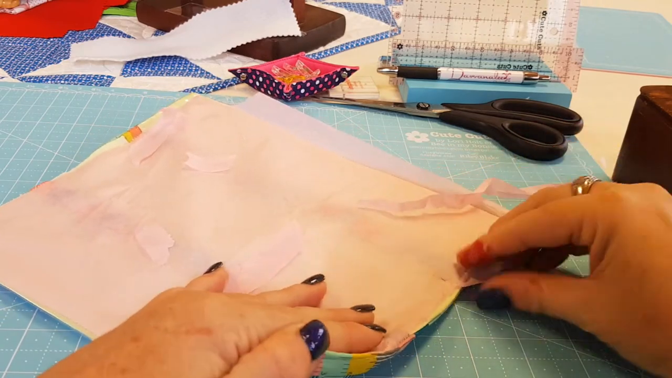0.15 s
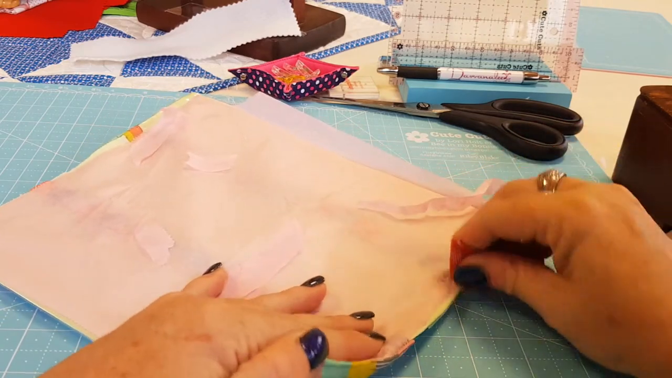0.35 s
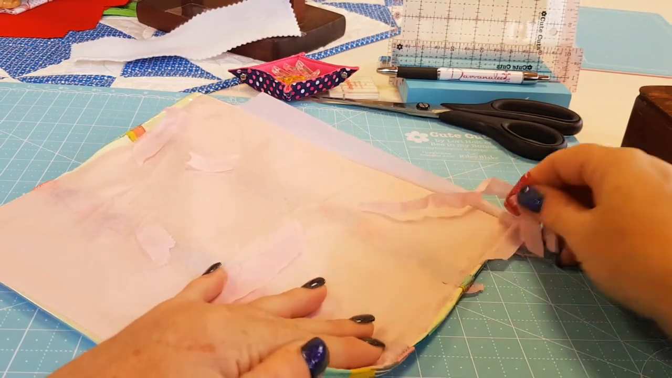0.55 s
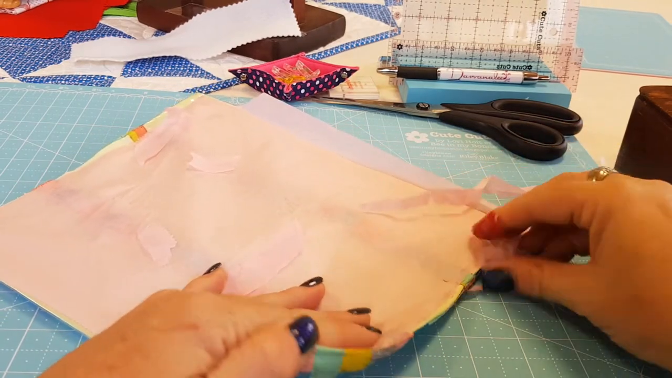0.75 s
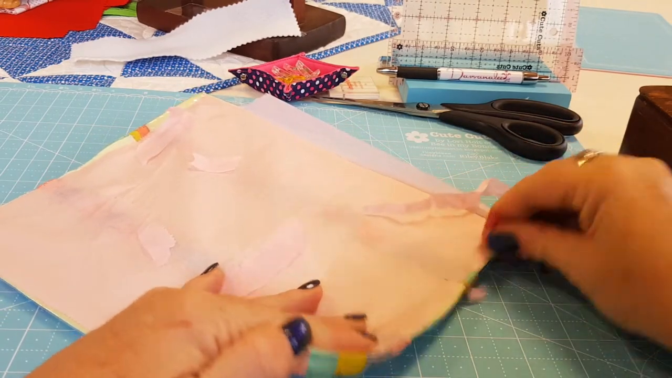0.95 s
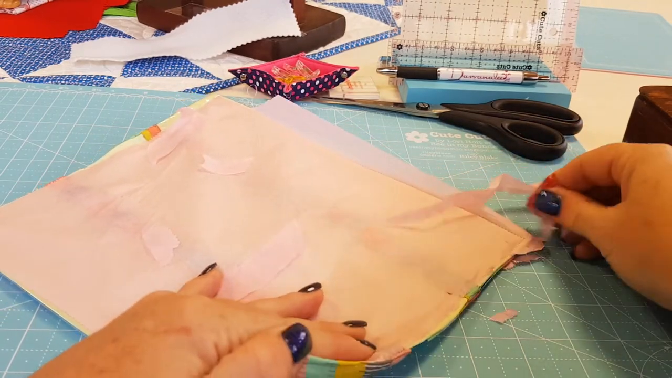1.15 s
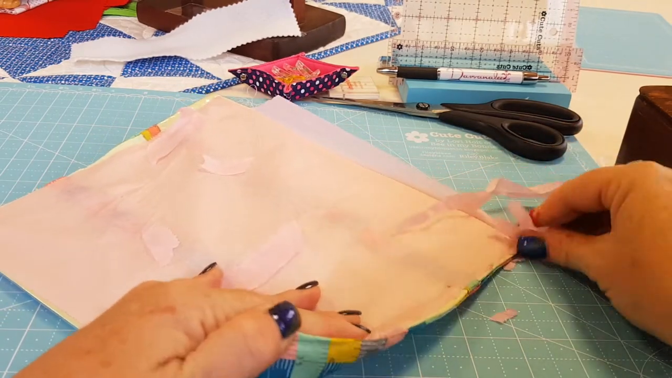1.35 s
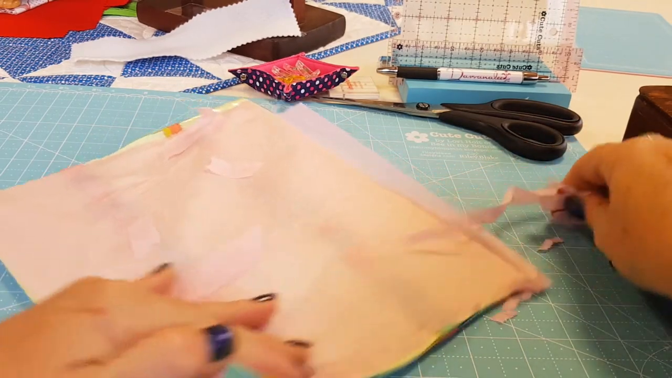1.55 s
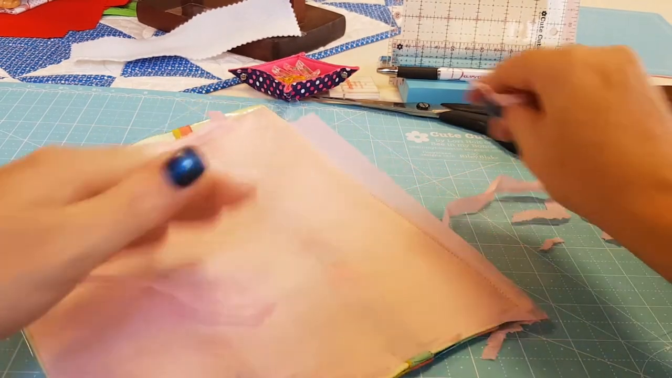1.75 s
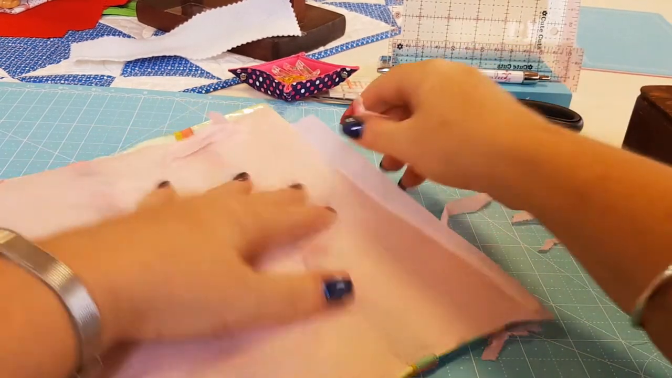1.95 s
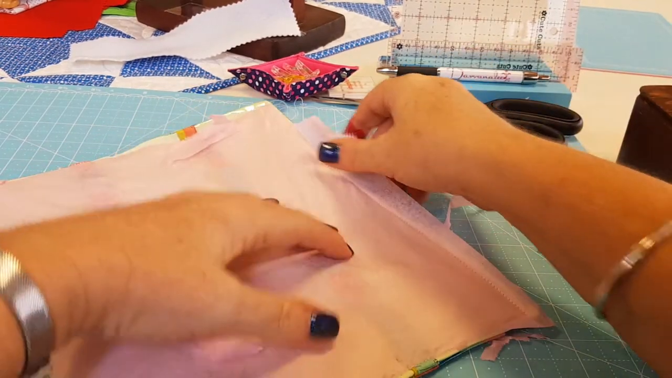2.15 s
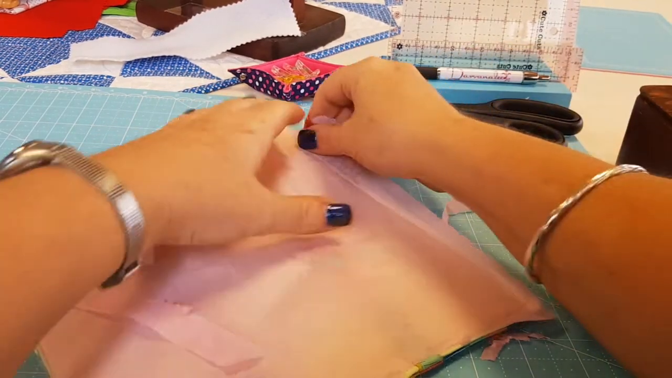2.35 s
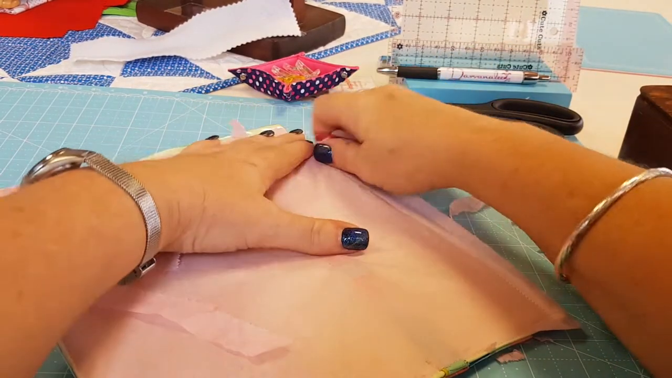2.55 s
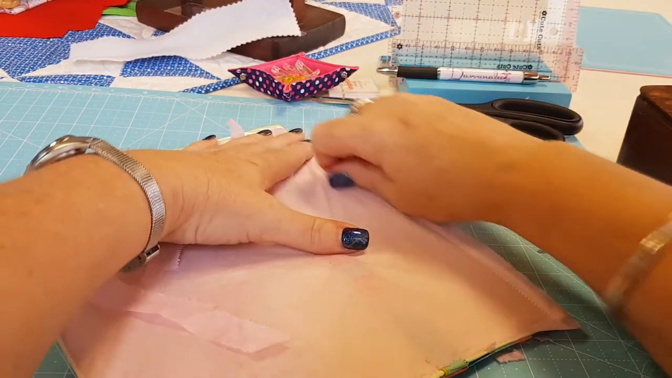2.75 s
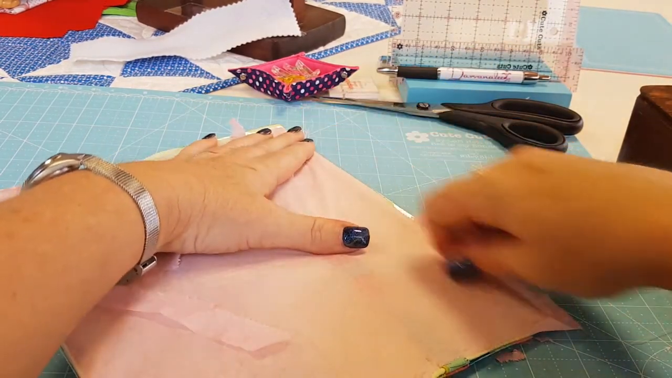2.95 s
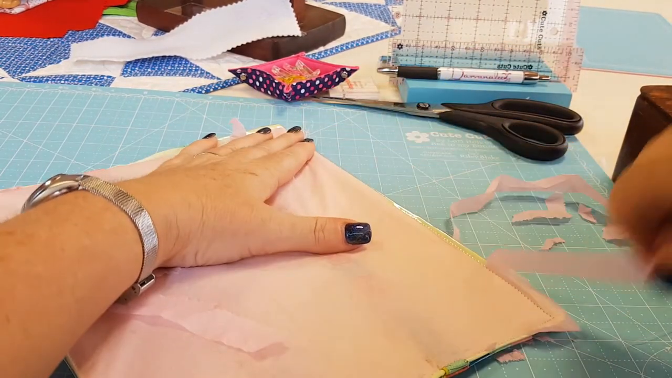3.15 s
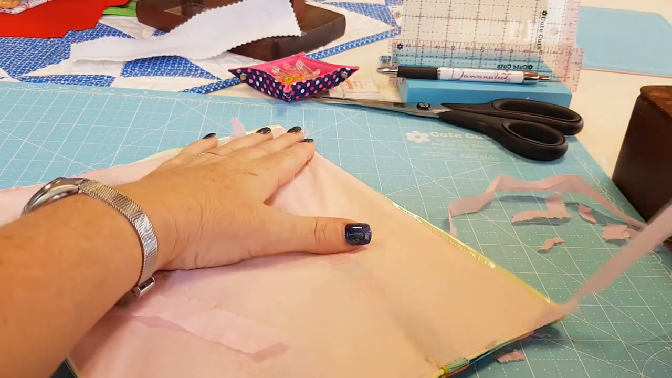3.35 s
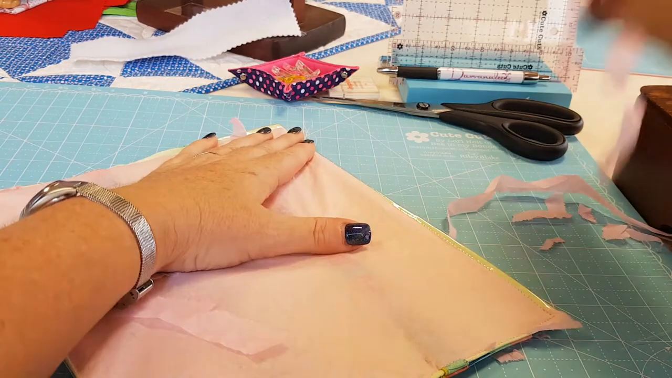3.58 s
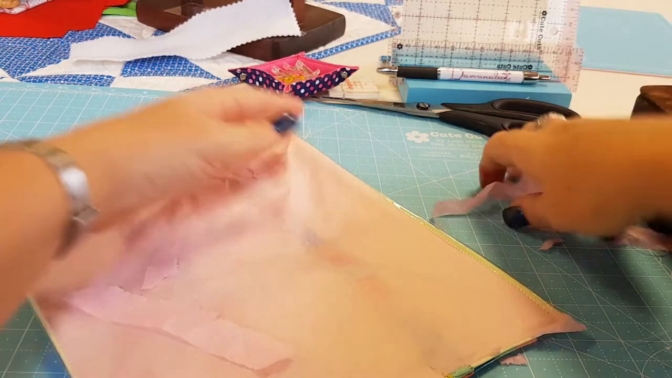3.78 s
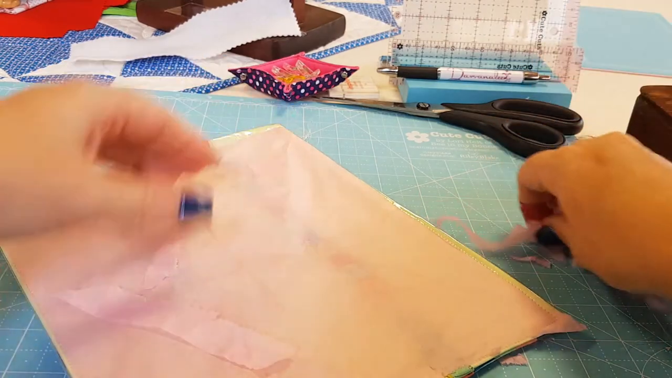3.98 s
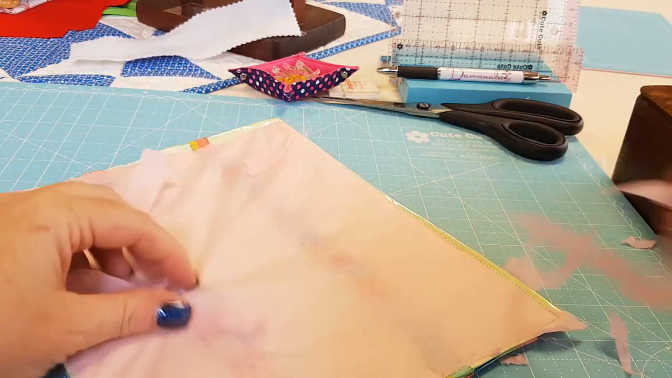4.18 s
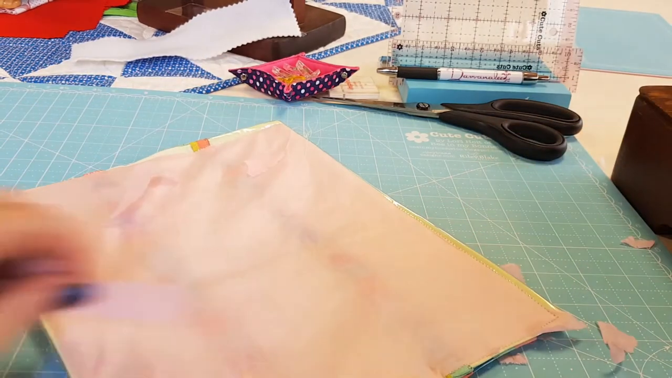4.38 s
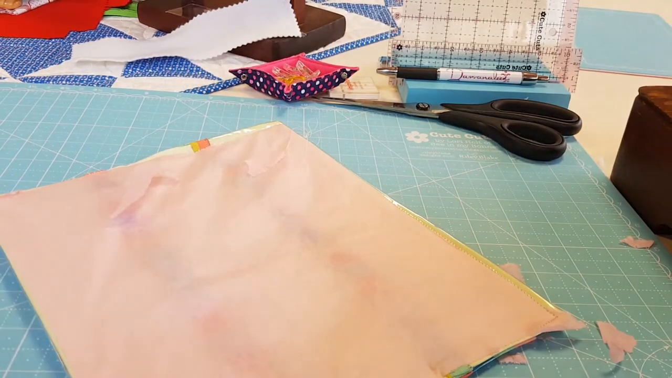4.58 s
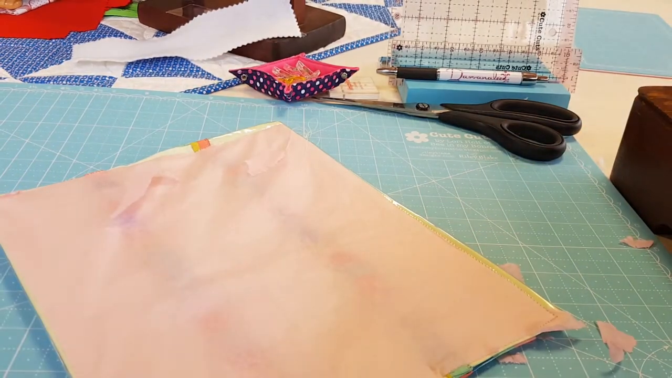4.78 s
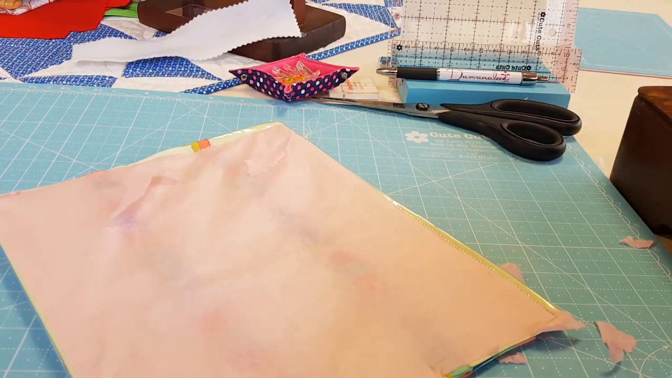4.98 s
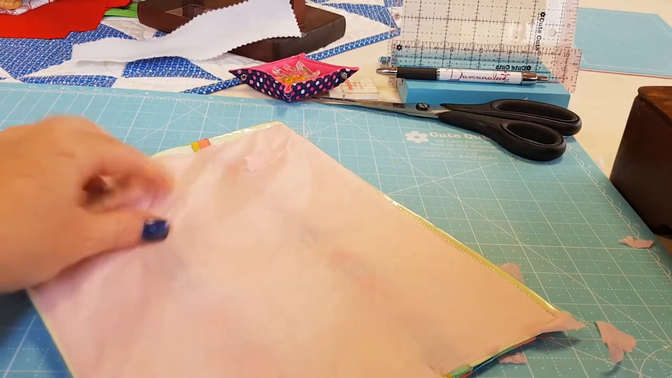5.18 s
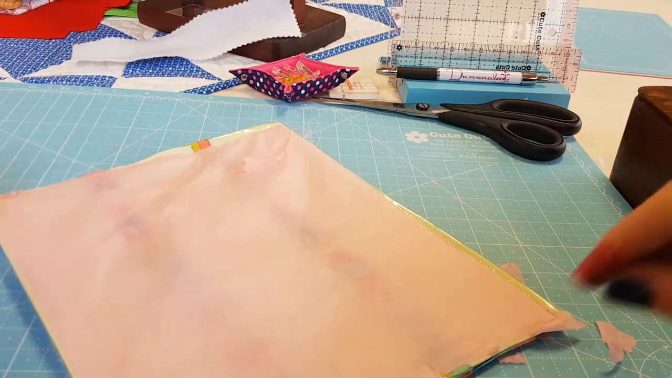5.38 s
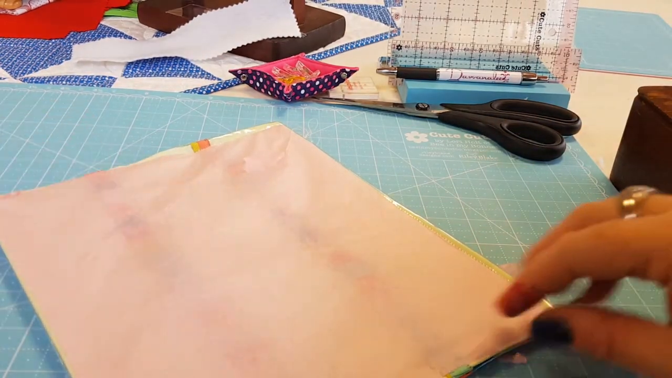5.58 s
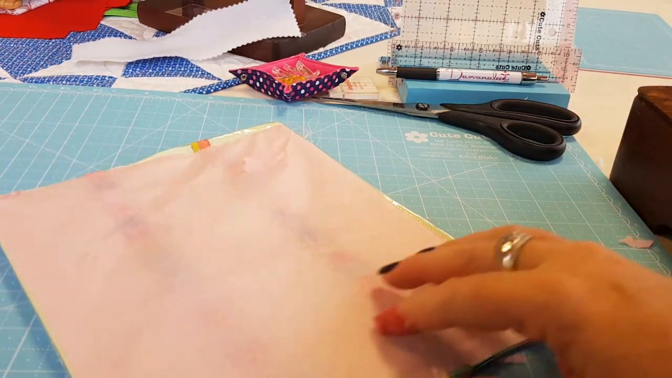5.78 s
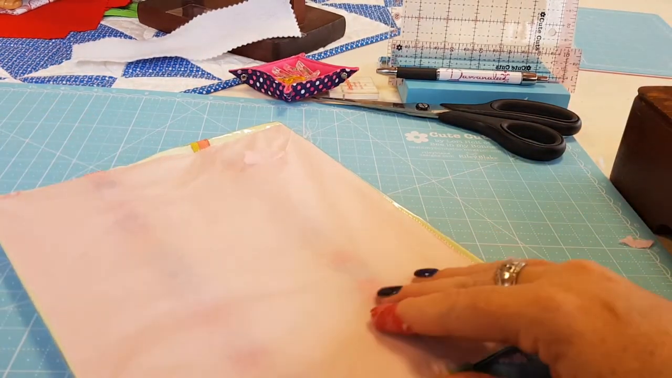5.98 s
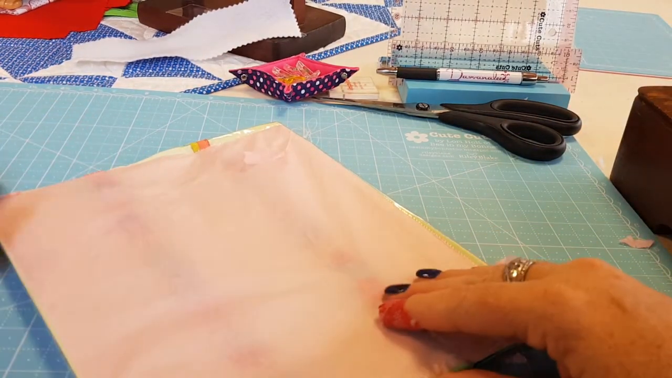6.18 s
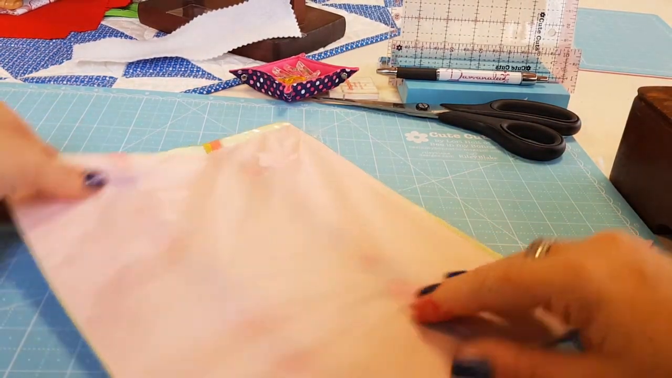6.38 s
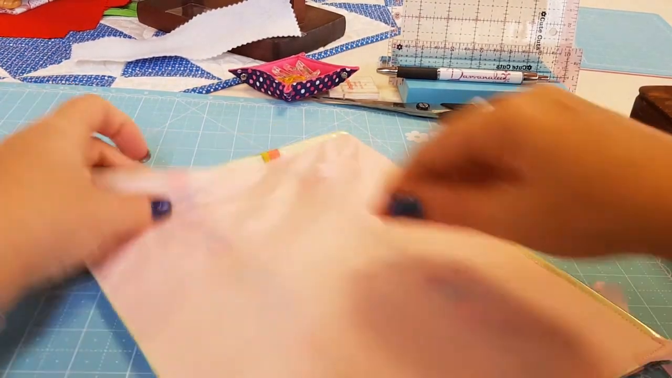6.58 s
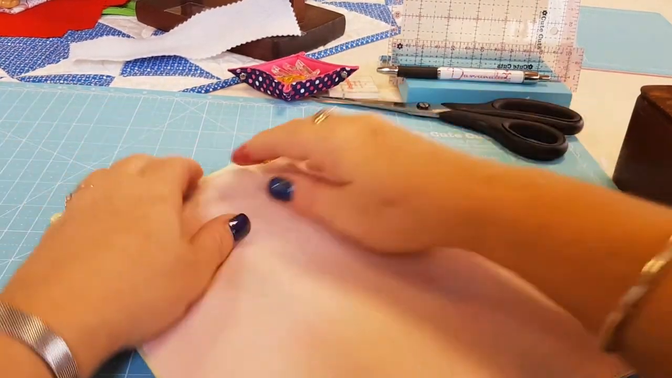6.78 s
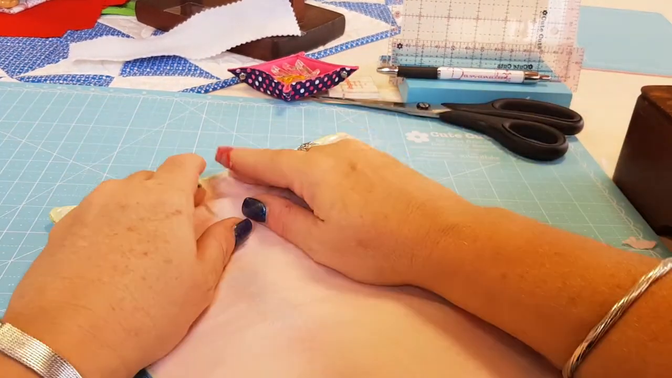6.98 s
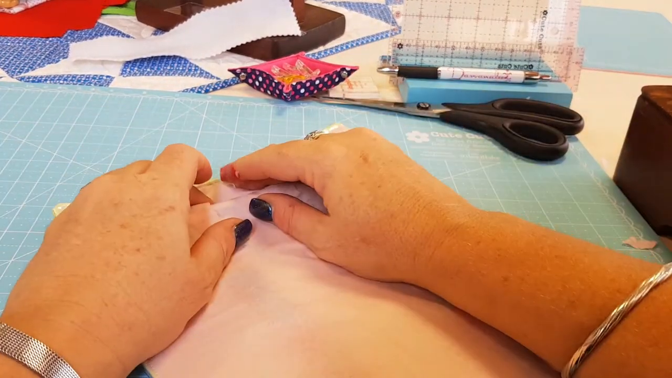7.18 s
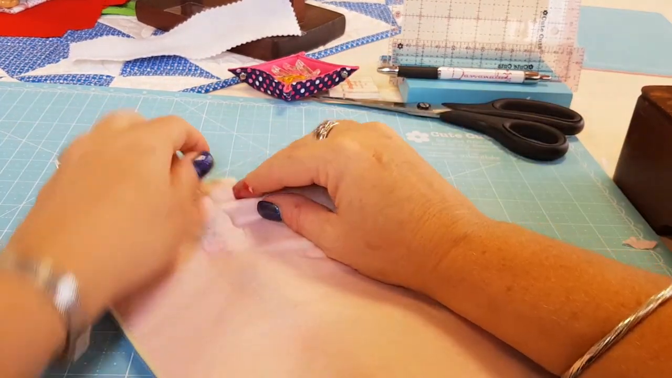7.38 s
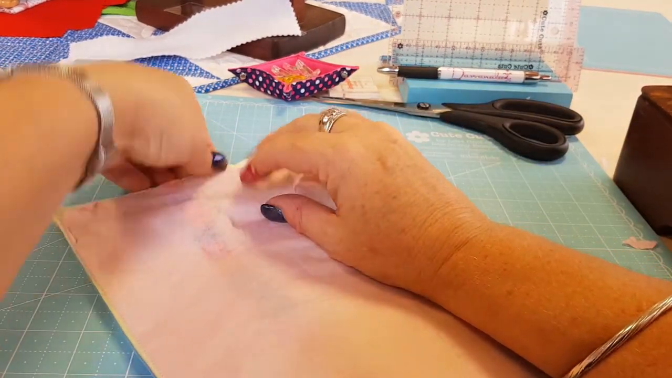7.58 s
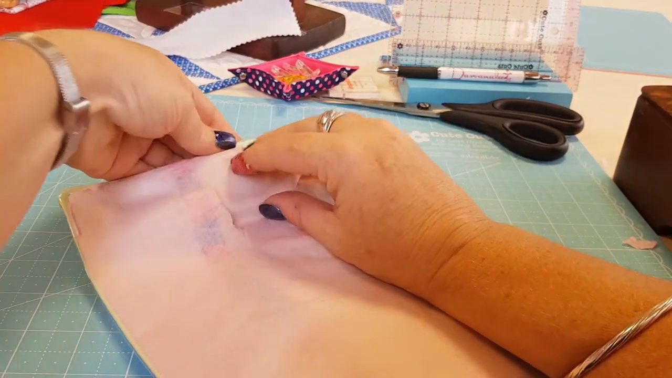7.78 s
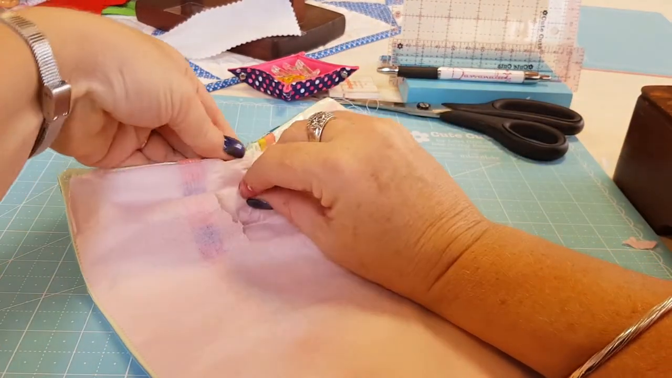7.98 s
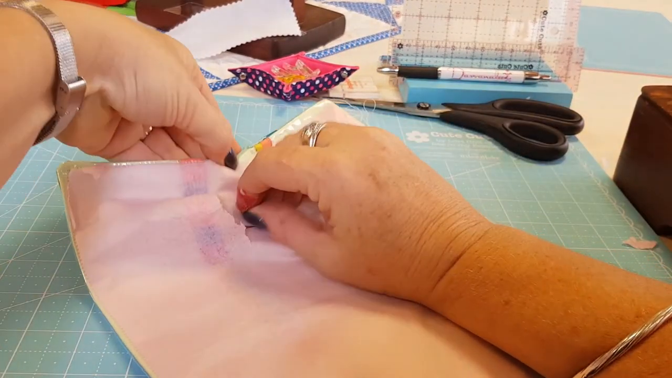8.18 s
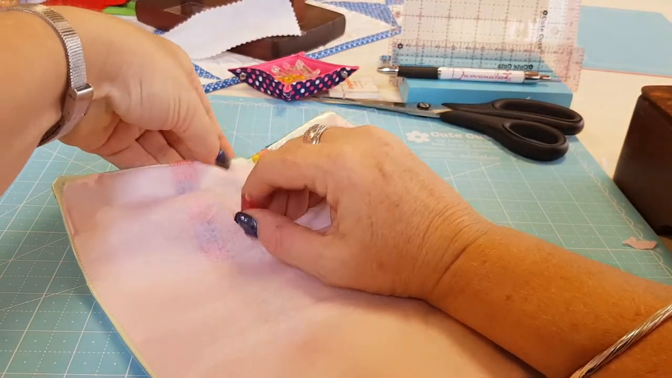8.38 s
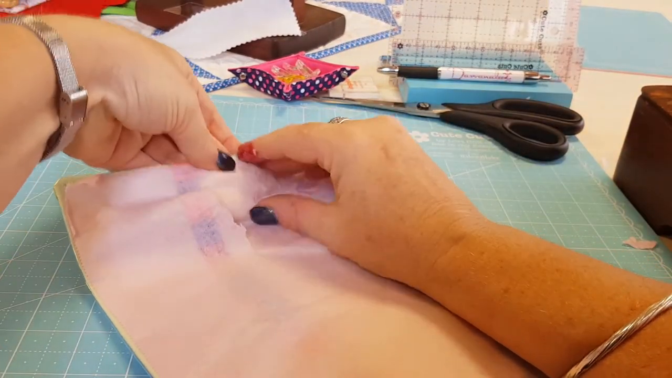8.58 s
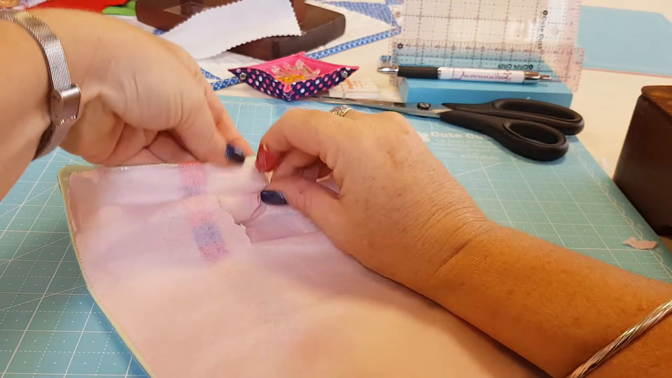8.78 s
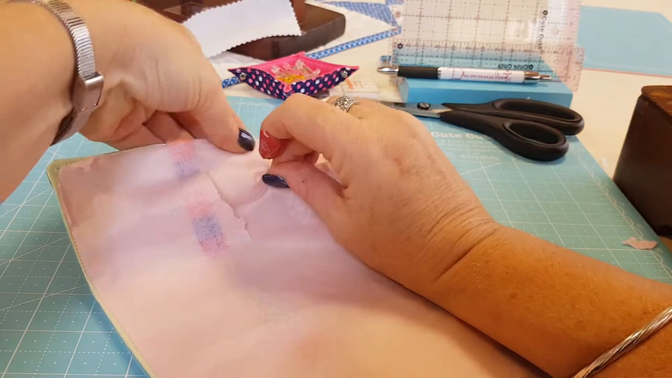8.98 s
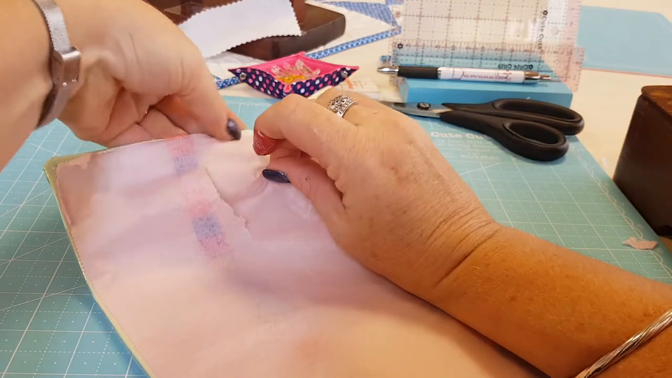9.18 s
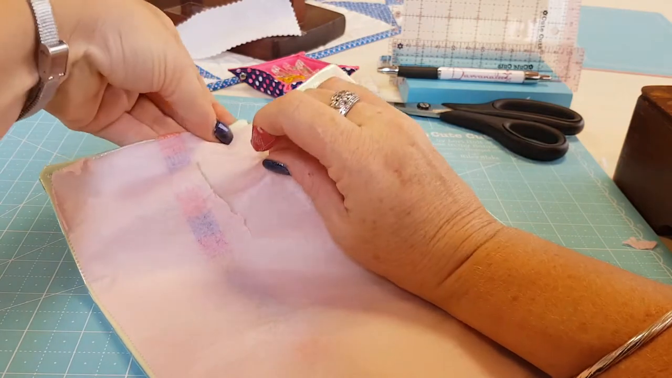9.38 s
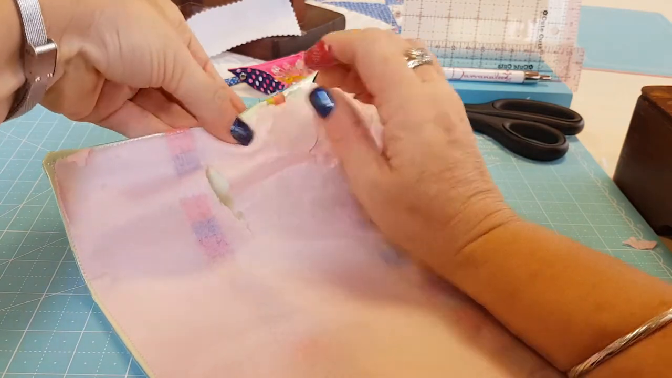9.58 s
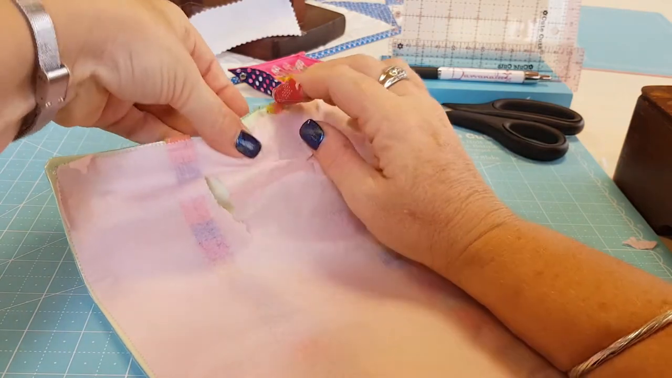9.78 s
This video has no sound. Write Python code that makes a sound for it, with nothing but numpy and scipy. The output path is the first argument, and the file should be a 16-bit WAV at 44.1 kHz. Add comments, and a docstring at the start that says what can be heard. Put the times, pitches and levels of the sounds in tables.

```python
"""Tissue paper is picked and torn off a line of stitching on a craft table, close to a camera.
First, fingertips pick and rip: showers of snapping fibres, each swelling and fading with one hand
movement, with a few sharp cracks. From 3.6 s the sheet rustles and hands knock and slide on the cutting
mat; between 4.4 and 7.8 s the left microphone port is bumped. Tearing resumes at 7.6 s and ends in
light picking. A motor hums in the small room throughout."""
import sys
import numpy as np
from scipy import signal
from scipy.fft import rfft, irfft, next_fast_len
from scipy.io import wavfile
from scipy.ndimage import uniform_filter1d, map_coordinates

SR = 44100
rng = np.random.default_rng(int(sys.argv[2]) if len(sys.argv) > 2 else 0)


def generate_wav(sig):
    """Save sig (samples, or channels by samples) to the path in sys.argv[1] as 16-bit PCM at SR."""
    pcm = np.round(np.clip(np.atleast_2d(sig).T, -1, 1) * 32767).astype(np.int16)
    wavfile.write(sys.argv[1], SR, pcm)


N = 433944
TIME = np.arange(N) / SR
FFT_SIZE = next_fast_len(N + SR // 2)
FFT_HZ = np.fft.rfftfreq(FFT_SIZE, 1 / SR)


# Pulls on the strip: t/s, length/s, level/dB, growth/dB, treble/dB
RIPS = [(.382, 0.13, -42, 5, 4), (.775, 0.091, -47.5, -4, -4.5), (.945, 0.084, -41.5, 5.5, 2.5),
        (1.932, 0.0083, -43, 18, -0.5), (1.96, 0.17, -47, -3.5, -1), (2.435, 0.037, -40.5, 5, -4),
        (2.565, 0.21, -43, -0.5, -1), (2.79, 0.14, -42, 3.5, 5), (2.95, 0.14, -40.5, -4, -0.5),
        (3.15, 0.072, -43.5, -3, 0.5), (3.25, 0.099, -40.5, 2.5, 2), (4.082, 0.27, -47, -7, -1),
        (7.61, 0.022, -56.5, -4, 13.5), (7.78, 0.12, -43.5, 9.5, -4.5), (8.155, 0.08, -43.5, -1.5, -6.5),
        (8.39, 0.095, -48, 9.5, 1.5), (8.51, 0.22, -45.5, -4.5, -3), (8.86, 0.1, -49, -2.5, -5.5),
        (9.115, 0.018, -50, -11, -4)]

def rips():
    """The strip tears along the stitches, in breaks of similar size."""
    return crackle(RIPS, attack_s=0.026, release_s=0.052,
                   breaks_per_s=520, spread_db=3.5, clump_db=1.0, hiss_db=-1.5)


# Shifts of the sheet: t/s, length/s, level/dB, growth/dB, treble/dB
RUSTLES = [(3.595, 0.16, -51, 7.5, -4), (3.78, 0.12, -50.5, 18.5, -3), (4.5, 0.13, -68.5, 0, 10.5),
           (5.155, 0.09, -44, 2, -2), (5.27, 0.031, -54.5, -3.5, -9), (5.505, 0.11, -48, -9.5, -7.5),
           (5.875, 0.059, -55.5, -10, -1), (6.24, 0.27, -48, 4, -3.5), (6.565, 0.012, -45, 2.5, -3),
           (6.67, 0.14, -52, 4, -3), (6.82, 0.25, -50, -11, -7.5), (7.07, 0.11, -48, 5.5, -6),
           (7.23, 0.19, -48.5, 6.5, -4)]

def rustles():
    """Shifted paper crackles in dense, uneven clumps."""
    return crackle(RUSTLES, attack_s=0.013, release_s=0.1,
                   breaks_per_s=1900, spread_db=6.0, clump_db=4.3, hiss_db=-0.1)


# Fingertip movements: t/s, length/s, level/dB, growth/dB, treble/dB
PICKS = [(0, 0.35, -62, -19.5, -0.5), (.19, 0.096, -54.5, 2, -2), (.595, 0.025, -46, 2.5, -8.5),
         (.68, 0.72, -62.5, -6, -0.5), (1.33, 0.39, -58, -8.5, 2.5), (2.15, 0.45, -57.5, -4, -2.5),
         (7.46, 0.37, -54.5, 7, -0.5), (7.92, 0.19, -49, 4.5, -3), (8.26, 0.78, -52, -2, -4.5),
         (9.16, 0.18, -54.5, 2, -2.5), (9.41, .41, -54.5, -1.5, -0.5)]

def picks():
    """Fingertips break sparse fibres at the paper's edge."""
    return crackle(PICKS, attack_s=0.072, release_s=0.082,
                   breaks_per_s=330, spread_db=6.0, clump_db=4.5, hiss_db=-0.5)


def crackle(rows, attack_s, release_s, breaks_per_s, spread_db, clump_db, hiss_db):
    """A harder pull breaks more fibres a second, over a duller hiss of paper on paper."""
    pull_db, taut_db = strokes(rows, attack_s, release_s)
    effort_db = pull_db + 51  # above gentle picking
    noise = rng.standard_normal(N)
    hiss = amp(hiss_db) * (noise - 0.5 * treble(noise, hz=5850))
    shower = fibres(breaks_per_s * amp(1.05 * effort_db), spread_db, clump_db)
    return stretched(amp(pull_db) * (shower + hiss), taut_db)


def fibres(breaks_per_s, spread_db, clump_db, strength_db=13):
    """Random tiny breaks, capped by a fibre's strength, bunched by the stitches."""
    breaks = rng.random(N) < breaks_per_s / SR
    size_db = spread_db * rng.standard_normal(N) + clump_db * wobble(130)
    pulses = amp(np.minimum(size_db, strength_db)) * rng.choice([-1, 1], N)
    return breaks * np.sqrt(SR / breaks_per_s) * unit(pulses)


def strokes(rows, attack_s, release_s):
    """Hand movements as curves: level/dB, then any extra columns. Attack and release span 20 dB."""
    t = np.arange(0, N, 32) / SR
    start, length, db, growth_db, *extras = np.transpose(rows)[..., None]
    age = t - start
    ramp_db = growth_db * (np.clip(age / length, 0, 1) - 0.5)
    edges = np.maximum(-age, 0) / attack_s + np.maximum(age - length, 0) / release_s
    power = amp(db + ramp_db - 20 * edges) ** 2
    total = power.sum(0) + 1e-12
    blended = [(power * column).sum(0) / total for column in extras]
    return [np.interp(TIME, t, column) for column in [10 * np.log10(total), *blended]]


def stretched(x, taut_db):
    """Taut paper puts more of its energy into the treble."""
    return x + (amp(taut_db) - 1) * treble(x, hz=4320)


# Single cracks: t/s, level/dB, treble/dB
SNAPS = [(.326, -24.5, -0.5), (0.379, -18.5, 1.5), (1.005, -22, 11), (1.466, -34, 1.5), (1.933, -20.5, 2),
         (2.432, -31, 8), (2.586, -18, -7), (2.652, -17.5, -12), (2.695, -18.5, 2), (3.732, -20, -12),
         (4.144, -29, 3), (4.162, -24.5, -3.5), (5.309, -30, -6), (6.36, -26, 2), (6.563, -35, -7),
         (7.785, -24.5, 2), (7.809, -23, -12), (7.876, -16, 0.5), (7.928, -24.5, 6), (8.104, -31, 3.5),
         (8.403, -24, -7), (8.934, -19.5, -4), (8.949, -23, -17), (9.081, -31.5, 3.5), (9.258, -24, -10),
         (9.399, -33, 0), (9.562, -37, 3)]

def snaps(t60_s=0.0094):
    """A crease or stitch hole buckles in a burst of a few milliseconds; the burst at 3.732 s is the hard click
    of a hand landing on the mat."""
    track, t = np.zeros(N), np.arange(SR // 20) / SR
    for s, db, _ in SNAPS:
        burst = rng.standard_normal(len(t)) * amp(-60 * t / t60_s)
        add(track, s, amp(db) * burst / np.abs(burst).max())
    return stretched(track, curve([(s, taut_db) for s, _, taut_db in SNAPS]))


def flexing(x, depth_db, size=512):
    """Bending shifts the sheet's resonances: patches of gain in time and frequency."""
    spectra = signal.stft(x, nperseg=size)[2]
    patches = uniform_filter1d(rng.standard_normal(spectra.shape), size=5, axis=0)
    patches = uniform_filter1d(patches, size=9, axis=1)
    gain = unit(amp(depth_db * unit(patches)))
    return signal.istft(spectra * gain, nperseg=size)[1][:N]


# Tissue spectrum: f/Hz, level/dB
PAPER_SPECTRUM = [(300, -2), (650, -1.5), (900, -8.5), (1350, 0.5), (2250, 1.5), (2750, -1), (3300, 3.5),
                  (4000, 2), (4700, 3.5), (8300, -4.5), (11000, -3), (14000, -4), (16000, -16.5)]

def paper():
    """Breaks and snaps, coloured by the sheet, arrive directly and scattered off the table."""
    tearing, rustling, picking = rips(), rustles(), picks()
    cracks = flexing(tearing + picking + snaps(), depth_db=3.0) + rustling
    crisp = treble(cracks, hz=2740)  # short waves scatter most
    scatter = room(cracks + 0.5 * crisp,
                   near_db=-5.5, near_t60_s=0.01, far_db=-12.5, far_t60_s=0.1, size=128)
    direct = ports(cracks - 0.79 * crisp)
    return coloured(direct + scatter, PAPER_SPECTRUM)


# Midrange swells: crest t/s, rise/s, f/Hz, level/dB
PAPER_SWELLS = [(0.44, 0.057, 2420, -43), (1.008, 0.024, 2730, -42.5), (2.6533, 0.0026, 2030, -26),
                (3.0, 0.14, 3530, -43), (3.359, 0.014, 4500, -38.5), (3.852, 0.075, 1480, -46.5),
                (5.245, 0.0081, 5100, -40), (6.578, 0.032, 2090, -44.5)]

def paper_swells(relative_bandwidth=0.39):
    """Brief midrange swells of paper noise: the body of a rip, or a scrape."""
    track = np.zeros(N)
    for crest_s, rise_s, hz, db in PAPER_SWELLS:
        swell = np.hanning(round(2 * rise_s * SR))
        bandpass = signal.iirpeak(hz, 1 / relative_bandwidth, fs=SR)
        band = signal.lfilter(*bandpass, rng.standard_normal(len(swell)))
        add(track, crest_s - rise_s, amp(db) * unit(lowpass(band, 2 * hz)) * swell)
    return track


# Table modes: f/Hz, level/dB, t60/s
TABLE_MODES = [(132.3, 0, 0.12), (265, 0, 0.061), (331.3, -2.5, 0.14), (422, 1.5, 0.035), (529, 0, 0.063),
               (948, -3.5, 0.039), (1210, -3.5, 0.036), (3090, 6, 0.01)]

def table_ring(t):
    """The struck table's damped modes, slightly different at each blow."""
    ring = np.zeros(len(t))
    for hz, db, t60_s in TABLE_MODES:
        decay = amp(db + rng.normal(0, 1.0) - 60 * t / t60_s)
        detuned_hz = hz * rng.normal(1, 0.021)
        ring += decay * np.sin(2 * np.pi * (detuned_hz * t + rng.random()))
    return ring


# Fingers and wrists landing on the mat: t/s, level/dB, hardness f/Hz
KNOCKS = [(2.024, -44, 280), (3.734, -32.5, 380), (3.766, -40, 500), (5.507, -32.5, 597), (5.566, -30, 980),
          (5.584, -36, 450), (5.61, -32.5, 174), (6.204, -43, 2730), (6.227, -38.5, 3060),
          (6.234, -38.5, 3830), (7.162, -42, 1510), (7.271, -43.5, 900), (7.419, -32.5, 640),
          (9.397, -49, 800)]

def knocks():
    """Each landing rings the table; flesh is soft and settles slowly, nails and rings are hard."""
    track, t = np.zeros(N), np.arange(SR // 4) / SR
    for s, db, hard_hz in KNOCKS:
        ring = table_ring(t)
        tick = 2.4 * rng.standard_normal(len(t)) * amp(-60 * t / 0.01)
        onset = 1 - np.exp(-t * hard_hz)
        blow = lowpass((ring + tick) * onset, hard_hz, order=3)
        add(track, s, amp(db) * blow / blow[t < 0.02].std())
    return track


# Palm strokes: t/s, length/s, level/dB, growth/dB
SLIDES = [(3.76, 0.21, -47.5, -14), (5.52, 0.071, -40.5, 0.5), (6.238, 0.075, -46, -12),
          (7.06, 0.15, -51.5, -6)]
# Skin friction spectrum: f/Hz, level/dB
PALM_SPECTRUM = [(50, -2), (140, 5), (380, 4.5), (700, -5.5), (1100, -10.5), (1700, -16), (8000, -45)]

def slides():
    """Skin drags unevenly over the padded sheet."""
    level_db, = strokes(SLIDES, attack_s=0.036, release_s=0.16)
    friction = coloured(rng.standard_normal(N), PALM_SPECTRUM)
    grip = amp(0.67 * wobble(70))
    return amp(level_db) * unit(friction * grip)


# Bumps at the left port: t/s, level/dB, f/Hz, contacts
BUMPS = [(4.416, -27.5, 88, 1), (6.065, -19, 121, 4), (6.317, -19, 107, 1), (7.505, -27.5, 95, 1),
         (7.81, -29, 70.6, 1)]

def bumps(first_gap_s=0.043, gap_ratio=0.37, loss_db=3, right_db=-22):
    """A dull push and rebound of pressure; repeated contacts come faster and weaker."""
    track, t = np.zeros(N), np.arange(SR // 10) / SR
    for s, db, hz, contacts in BUMPS:
        cycles = hz * t
        push = np.sin(2 * np.pi * cycles) * cycles ** 2 * np.exp(-cycles / 0.25)
        for k in range(round(contacts)):
            delay_s = first_gap_s * sum(gap_ratio ** np.arange(k))
            add(track, s + delay_s, amp(db - loss_db * k) * push / np.abs(push).max())
    return track * amp([[0], [right_db]])


# Motor partials: f/Hz, level/dB
HUM_PARTIALS = [(48.45, -53), (96.9, -58), (145.35, -58.5), (193.8, -64), (586.8, -69)]

def motor_hum():
    """A motor's partials, slightly unsteady in level and phase."""
    hum = np.zeros(N)
    for hz, db in HUM_PARTIALS:
        peak = np.sqrt(2) * amp(db + 1.4 * wobble(1.64))
        phase = 2 * np.pi * (hz * TIME + rng.random())
        hum += peak * np.sin(phase + 0.0018 * hz * wobble(3.2))
    return hum


# Airflow spectrum: f/Hz, level/dB
AIR_SPECTRUM = [(25, -19.5), (75, 2.5), (240, -2), (660, -9), (800, -27), (1300, -35.5), (2200, -33.5),
                (2700, -39), (4700, -36.5), (8000, -49), (16000, -47.5)]

def motor_air():
    """The dull rush of the motor's air, wider in the treble."""
    common, left, right = [coloured(rng.standard_normal(N), AIR_SPECTRUM) for _ in range(3)]
    apart = np.array([0.54 * side + 2.35 * treble(side, hz=770) for side in (left, right)])
    return amp(-55.0) * (common + apart)


# Finger position: t/s, right microphone lead/ms
FINGER_POSITION = [(1.0, 0.11), (2.0, -0.093), (3.7, 0.16), (4.2, -.18), (5.5, -0.26), (8, -0.042)]

def ports(x):
    """Sound reaches the nearer microphone first."""
    lead_samples = curve(FINGER_POSITION) * SR / 1000
    return np.array([map_coordinates(x, [np.arange(N) + side * lead_samples / 2], order=3)
                     for side in (-1, 1)])


def room(x, near_db, near_t60_s, far_db, far_t60_s, size):
    """Table clutter scatters sound briefly, the walls for longer: diffuse, unlike in each channel."""
    power = np.abs(signal.stft(x, nperseg=size)[2]) ** 2
    lingering = 0
    for db, t60_s in (near_db, near_t60_s), (far_db, far_t60_s):
        keep = amp(-60 * size / SR / t60_s)  # energy share left per half frame
        lingering += amp(db) ** 2 * signal.lfilter([1 - keep], [1, -keep], power)
    noise = signal.stft(rng.standard_normal((2, N)), nperseg=size)[2]
    return signal.istft(noise / noise.std() * np.sqrt(lingering), nperseg=size)[1][:, :N]


def amp(db):
    """Decibels to gain."""
    return 10 ** (np.asarray(db) / 20)


def unit(x):
    """Scale to rms 1."""
    return x / np.sqrt(np.mean(x ** 2) + 1e-20)


def curve(rows):
    """One value per sample from (t/s, value) rows."""
    return np.interp(TIME, *np.transpose(rows))


def wobble(knots_per_s):
    """Smooth random curve."""
    knots = rng.standard_normal(int(N * knots_per_s / SR) + 4)
    return map_coordinates(knots, [TIME * knots_per_s], order=2)


def add(track, start_s, sound):
    """Mix a sound into the track."""
    part = track[..., round(start_s * SR):][..., :sound.shape[-1]]
    part += sound[..., :part.shape[-1]]


def lowpass(x, hz, order=2):
    """Causal low-pass."""
    return signal.sosfilt(signal.butter(order, min(hz, 0.45 * SR), fs=SR, output="sos"), x)


def treble(x, hz):
    """The part of x above a soft corner."""
    gain = 1 - 1 / (1 + (FFT_HZ / hz) ** 5)
    return irfft(rfft(x, FFT_SIZE) * gain, FFT_SIZE)[..., :N]


def coloured(x, points, size=4096):
    """Minimum-phase filter of unit energy, shaped by (f/Hz, level/dB) points."""
    hz, db = np.transpose(points)
    log_hz = np.log(np.fft.rfftfreq(size, 1 / SR) + 1)
    gain = amp(np.interp(log_hz, np.log(hz), db))
    cepstrum = irfft(np.log(gain))[:size // 2]
    cepstrum[1:] *= 2
    pulse = irfft(np.exp(rfft(cepstrum, size)))
    return np.apply_along_axis(signal.oaconvolve, -1, x, pulse / np.linalg.norm(pulse))[..., :N]


def scene():
    """Paper and hands on the table, port bumps and the motor, in the room."""
    handling = knocks() + slides() + paper_swells()
    echo = room(handling, near_db=-9, near_t60_s=0.035, far_db=-11, far_t60_s=0.25, size=256)
    return paper() + handling + echo + bumps() + motor_hum() + motor_air()


def record(dry, band_limit_hz=16300):
    """Band-limited microphones: the left louder in the mids, the right in the treble."""
    left, right = dry
    left = amp(1.13) * (left - 0.046 * treble(left, hz=7240))
    right = amp(-0.35) * (right + 0.5 * treble(right, hz=6560))
    spectrum = rfft(np.array([left, right]), FFT_SIZE)
    return irfft(spectrum * (FFT_HZ < band_limit_hz), FFT_SIZE)[:, :N]


dry = scene()
out = record(dry)
generate_wav(out)
```